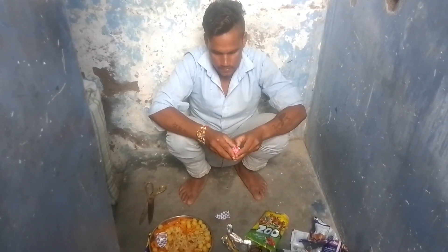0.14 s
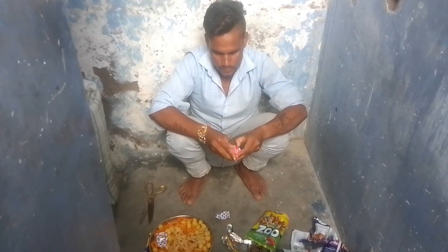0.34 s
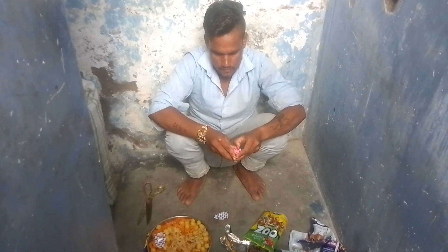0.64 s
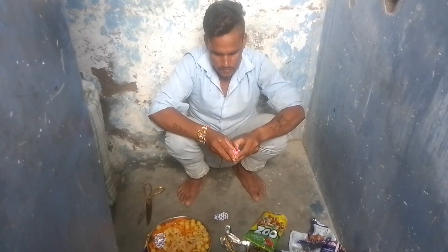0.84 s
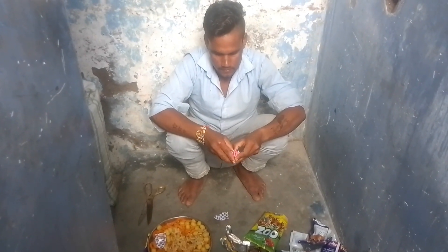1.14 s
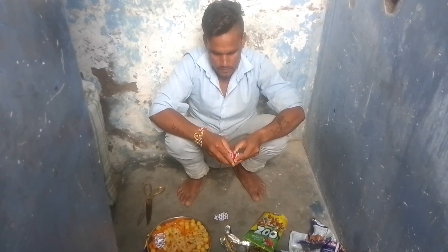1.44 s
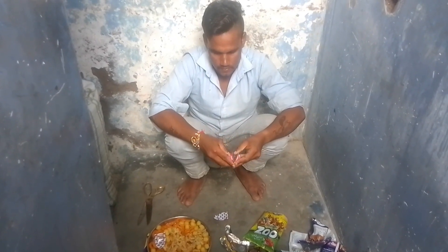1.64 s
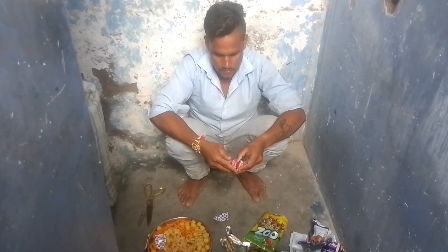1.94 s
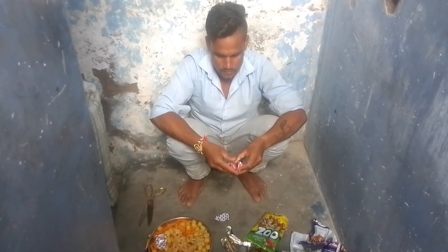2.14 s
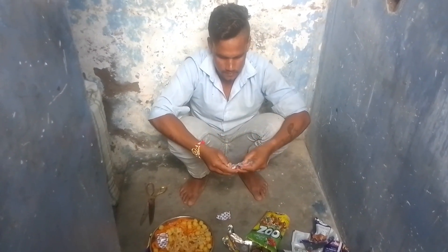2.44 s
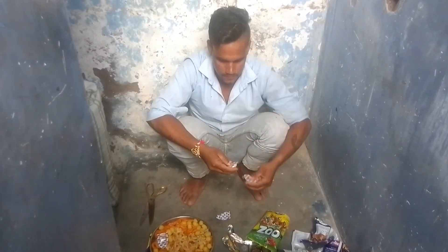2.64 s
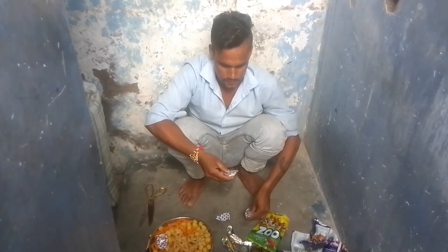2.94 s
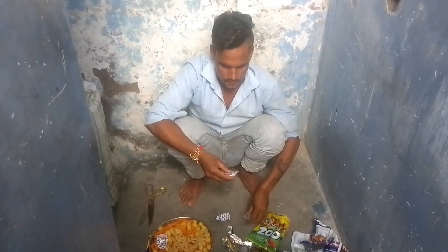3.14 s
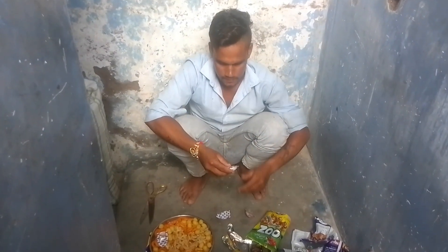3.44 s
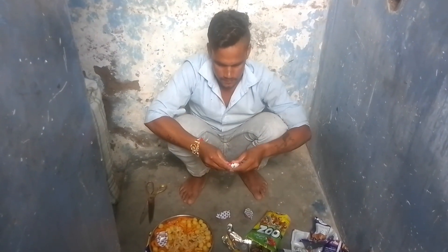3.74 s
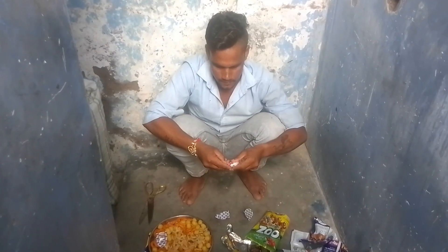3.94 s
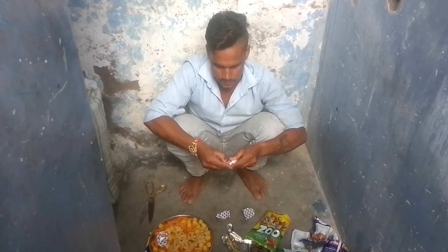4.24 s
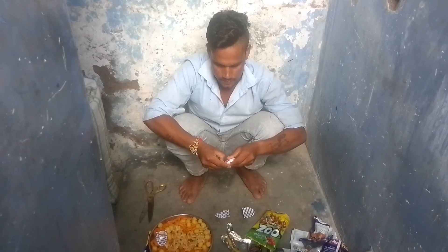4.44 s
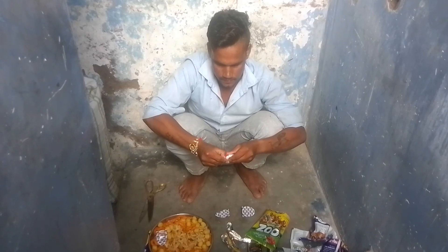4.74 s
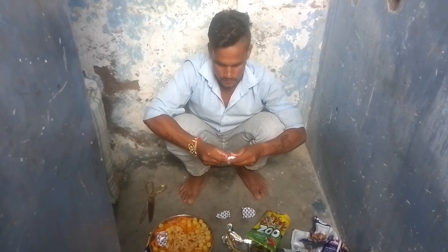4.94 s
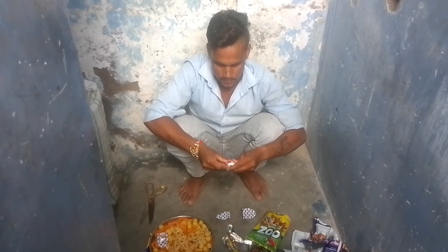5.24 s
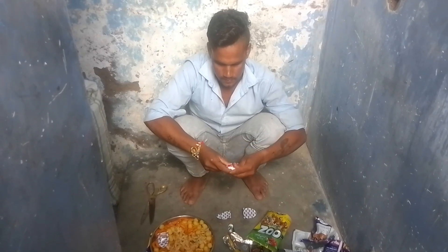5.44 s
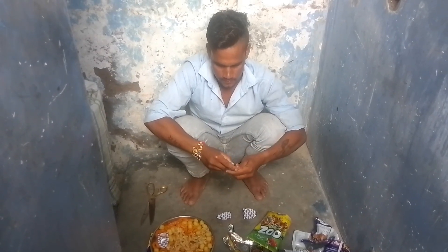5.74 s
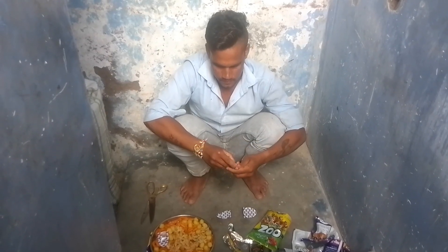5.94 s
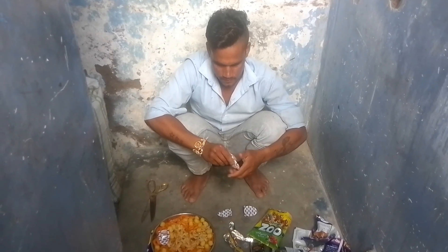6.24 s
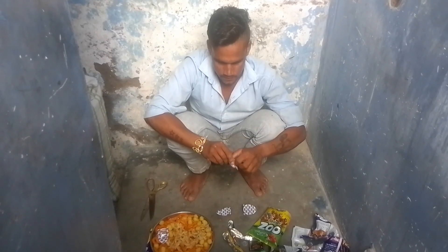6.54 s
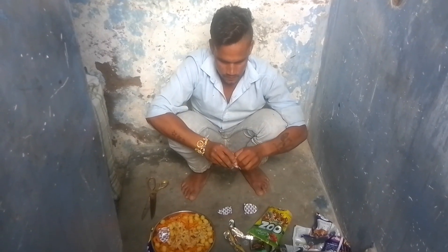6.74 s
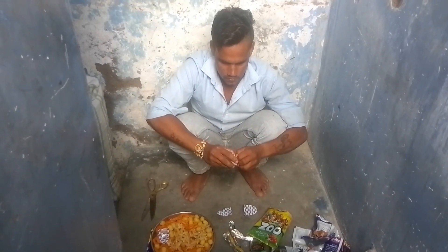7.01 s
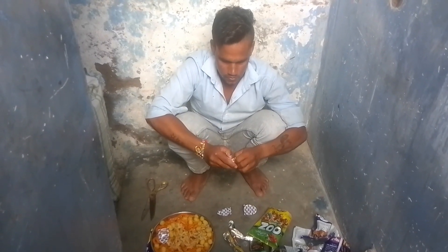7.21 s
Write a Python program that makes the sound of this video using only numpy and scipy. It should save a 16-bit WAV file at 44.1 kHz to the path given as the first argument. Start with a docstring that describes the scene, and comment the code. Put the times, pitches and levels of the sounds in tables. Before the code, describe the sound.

Crisp plastic film snaps, rips briefly and squeaks faintly under fingers over dull air noise, finishing with a crowded sharp crack and a low hollow swell.

```python
"""Hands press, crinkle and tear a small stiff plastic wrapper in a narrow room with bare plastered walls.
Over a steady dull air noise and faint hiss, weak snaps come first, then sharp cracks, tears and a brief hum.
Each crack is a crease buckling, which rings a panel of film; tears are quick runs of tiny fractures.
Between them fingers rub and squeak by stick and slip, and from the middle on a few snaps leave a thin ring.
The loudest snaps crowd together near the end, a low hollow swell follows, and the close walls answer throughout."""
import sys
import numpy as np
from scipy import signal
from scipy.fft import rfft, irfft
from scipy.io import wavfile
from scipy.ndimage import uniform_filter1d, minimum_filter1d

SR = 44100
rng = np.random.default_rng(int(sys.argv[2]) if len(sys.argv) > 2 else 0)


def master_out(mix):
    """Clip the mix to full scale and print it as 16-bit PCM to the path in sys.argv[1]."""
    frames = np.transpose(np.atleast_2d(mix))
    ceiling = np.clip(frames, -1, 1)
    pcm = np.round(ceiling * 32767).astype(np.int16)
    wavfile.write(sys.argv[1], SR, pcm)


N = 325007

# creases that snap, levels relative: (time [s], crack level [dB], ping pitch [Hz], panel pitch [Hz], panel
# level [dB], brightness [dB], length of the tear that follows [s], 0 for none)
CREASES = [(0.2386, -38.5, 5500, 2200, -48, -6, 0.0028), (0.3440, -24.5, 6060, 2040, -39.5, -1, 0.0079),
           (1.0438, -19, 8200, 1830, -31.5, -2, .048), (1.3677, -13, 8500, 1920, -26.5, 1.5, 0.038),
           (1.4333, -8, 9900, 1240, -19.5, -0.5, 0), (1.644, -35, 10000, 1800, -61, -1, 0.0027),
           (1.6655, -17.5, 10200, 1810, -35.5, 7, 0.00099), (1.7923, -21.5, 7200, 2110, -30, 12.5, 0.0008),
           (1.8847, -27.5, 8760, 1690, -46, 14, 0), (1.9775, -26, 9700, 1827, -36.5, 5, 0.015),
           (2.0179, -24, 8940, 1780, -30, -5, 0.0019), (2.2857, -53, 9360, 1730, -58, 0, 0),
           (2.4668, -18, 10550, 2050, -32.5, 5, 0.034), (3.1115, -47, 7530, 2377, -57, -3, 0),
           (3.133, -40, 7100, 2370, -50, -2, 0.064), (3.242, -26.5, 7810, 2100, -39.5, -1.5, 0),
           (3.8456, -33.5, 8374, 1950, -45, 3, 0.00066), (4.7922, -11.5, 7100, 1768, -23, -2.5, 0.033),
           (4.8406, -16.5, 7310, 1890, -21.5, -6.5, 0), (5.1229, -42.5, 7400, 2150, -37.5, -9, 0.0017),
           (5.2026, -50.5, 9640, 2235, -45.5, 3, 0), (5.5401, -30.5, 9300, 2120, -36, 2, 0.0054),
           (5.5573, -29.5, 9110, 1850, -33.5, -2, 0), (5.8664, -53, 9660, 1950, -45.5, 4, 0.00097),
           (5.9358, -53.5, 9150, 2050, -53.5, -6, 0.027), (6.1668, -61, 9430, 1710, -55, -7.5, 0.011),
           (6.314, -40.5, 8600, 2088, -53.5, 4, 0.0027), (6.7134, -46, 9700, 2510, -50.5, -9, 0.0044),
           (6.769, -50, 9350, 1920, -45.5, -5, 0.0068), (6.8429, -36.5, 9200, 1600, -53.5, 0.5, 0),
           (7.051, -29.5, 9865, 1957, -35, 1, 0.0044), (7.0582, -5, 7476, 2060, -16, 7, 0.00075),
           (7.074, -5, 7380, 2020, -16, 6.5, 0), (7.09, -11, 7300, 2130, -18, 5.5, 0.0031),
           (7.2017, -20.5, 8360, 2320, -32, 9, 0.0039), (7.217, -25.5, 8130, 1967, -32.5, -7, 0.00044)]


def snaps(crack_db=-1, body_db=3.5, thud_db=-18, rasp_db=-6.5, edge_db=-16.0, ping_db=-6, bump_db=-15,
          crack_hz=8000, bump_hz=260, rasp_hz=4300, edge_hz=12700):
    """Snap-through buckling: a crease flips in milliseconds of micro-cracks and rings the lower panel beside it."""
    hold_s, fade_s = 0.00052, 0.003  # full power, then the time constant of the amplitude
    panel_octaves, thud_pitch_ratio = .72, .42  # the thud's pitch is relative to the panel
    # a bright snap has more edge, and less rasp and thud: dB per dB of brightness
    edge_slope, rasp_slope, thud_slope = 1.1, 1, 1.4
    # a harder snap spreads wider: dB of rasp and edge per dB of crack above an ordinary snap
    spread_slope, ordinary_snap_db = 0.065, -24.5
    out, t = np.zeros(N), np.arange(SR // 2) / SR
    power = np.exp(-2 * np.maximum(t - hold_s, 0) / fade_s)
    for s, db, ping_hz, panel_hz, panel_db, bright_db, _ in CREASES:
        low_db = (db + panel_db) / 2 + thud_db - thud_slope * bright_db
        wide_db = db + spread_slope * (db - ordinary_snap_db)
        parts = [
            (crack_hz, .7, db + crack_db),
            (ping_hz, .3, db + ping_db),
            (panel_hz, panel_octaves, panel_db + body_db),
            (thud_pitch_ratio * panel_hz, .9, low_db),
            (bump_hz, 1.4, low_db + bump_db),
            (rasp_hz, .65, wide_db + rasp_db - rasp_slope * bright_db),
            (edge_hz, .42, wide_db + edge_db + edge_slope * bright_db)]
        add(out, s, cupped_hands(radiate(power, parts)))
    return out


def tears(fractures_per_s=650, rasp_db=-3.5, edge_db=-11.5, bump_db=-12,
          crack_hz=8000, rasp_hz=3900, edge_hz=12300, thud_hz=800, bump_hz=260):
    """Fracture: some snaps run on as a tear of uneven tiny breaks, too quick to tell apart."""
    delay_s = .008  # from the snap to its tear
    crackle_db, panel_offset_db, thud_offset_db = -9.5, -5, -17  # relative to the snap and its panel
    out, t = np.zeros(N), np.arange(SR // 2) / SR
    for s, snap_db, _, panel_hz, panel_db, _, length in CREASES:
        if length > 0:
            db, thud_db = snap_db + crackle_db, panel_db + thud_offset_db
            parts = [
                (crack_hz, .75, db),
                (rasp_hz, 1.1, db + rasp_db),
                (edge_hz, .4, db + edge_db),
                (panel_hz, .8, panel_db + panel_offset_db),
                (thud_hz, 1.1, thud_db),
                (bump_hz, 1.4, thud_db + bump_db)]
            fractures = slips(t, fractures_per_s, spread_db=4.5, fade_s=0.00036) * (t < length)
            add(out, s + delay_s, radiate(fractures, parts))
    return out


def fingers():
    """Dry friction: fingers rub and brush the film, and the panel slides back under them after every snap."""
    # rubs, levels relative: (start [s], length [s], pitch [Hz], width [octaves], level [dB])
    rubs = [(1.18, 0.13, 2053, .35, -55.5), (1.795, 0.02, 2100, 0.28, -36.5), (2.121, 0.2, 1580, 0.5, -60),
            (2.625, .035, 1940, 0.24, -41), (2.68, 0.24, 1970, 0.6, -64), (3.14, .045, 3374, .14, -52),
            (3.191, 0.089, 1255, 0.6, -56.5), (3.25, 0.045, 1834, 0.12, -47.5),
            (3.848, 0.046, 2550, 0.29, -54), (5.137, 0.077, 2020, .45, -52),
            (5.882, 0.12, 1944, 0.38, -50.5), (6.169, .21, 2020, 2.1, -71.5),
            (6.672, 0.23, 2100, 0.64, -53.5), (6.743, 0.029, 2280, 0.56, -40),
            (7.215, .012, 970, .34, -39.5), (7.258, 0.16, 2100, .8, -56)]
    # light brushes of dry skin, levels relative: (start [s], length [s], level [dB])
    light_touches = [(0.828, 0.038, -65.5), (2.80, 0.17, -67), (3.548, 0.33, -70), (7.28, 0.079, -58)]
    brush_hz, brush_octaves = 7400, 1.4
    # settling: pitch and level are relative to the panel; the limit holds however hard the snap
    settle_s, settle_pitch_ratio, settle_octaves = .03, 1.1, .55
    settle_db, settle_limit_db = -8.5, -39
    brushes = [(s, length, brush_hz, brush_octaves, db) for s, length, db in light_touches]
    settling = [(s, settle_s, settle_pitch_ratio * panel_hz, settle_octaves,
                 min(panel_db + settle_db, settle_limit_db))
                for s, _, _, panel_hz, panel_db, _, _ in CREASES]
    return strokes(rubs + brushes + settling, slips_per_s=610)


def squeaks(octaves=.035, typical_s=.11, purity=.4):
    """Stick-slip oscillation: taut film sings in one narrow band, which is purer the longer the squeak lasts."""
    # squeaks of the stretched film, levels relative: (start [s], length [s], pitch [Hz], level [dB])
    taut_film = [(0.239, 0.0093, 1035, -52), (0.347, 0.0067, 1080, -48), (.346, 0.022, 2125, -52),
                 (1.795, .01, 2450, -39), (1.152, 0.19, 10440, -64), (1.19, .11, 7880, -58.5),
                 (2.30, .05, 10950, -63), (2.352, .085, 10950, -49.5), (2.37, 0.11, 12000, -57.5),
                 (5.119, 0.0062, 7180, -41), (6.313, .006, 5920, -45), (6.315, 0.0078, 8830, -47.5),
                 (6.833, 0.093, 9300, -56.5)]
    narrow = [(s, length, hz, octaves * (typical_s / length) ** purity, db)
              for s, length, hz, db in taut_film]
    return strokes(narrow, slips_per_s=3000)


def rings(hz=2859, octaves=0.038, t60_s=.65):
    """Free decay of a lightly damped resonance: a thin tone starts with the snap and dies slowly."""
    # snaps after which the film rings on, levels relative: (time [s], level [dB])
    ringing_snaps = [(3.846, -59), (5.125, -52), (5.541, -50.5)]
    out, t = np.zeros(N), np.arange(SR * 3 // 4) / SR
    power = from_db(-60 * t / t60_s) ** 2
    for s, db in ringing_snaps:
        add(out, s, radiate(power, [(hz, octaves, db)]))
    return out


def hum(hz=430.8, octaves=0.47):
    """Resonance under rough excitation: a faint hum swells and fades on one low pitch."""
    # swells of the hum, levels relative: (start [s], length [s], level [dB])
    hum_swells = [(1.097, 0.31, -65), (1.93, 0.3, -69), (2.45, 0.5, -69.5)]
    return strokes([(s, length, hz, octaves, db) for s, length, db in hum_swells], slips_per_s=1300)


def hollow():
    """Superposed low resonances: dense irregular pulses make a hollow sound that swells and fades."""
    # hollow swells, levels relative: (start [s], length [s], pitch [Hz], width [octaves], level [dB])
    hollow_swells = [(7.305, 0.055, 383, 0.14, -37.5), (7.32, 0.085, 180, 0.31, -43.5),
                     (7.32, 0.094, 543, 0.26, -46)]
    return strokes(hollow_swells, slips_per_s=3000)


def strokes(table, slips_per_s):
    """Stick and slip: small releases feed one resonance under a stroke that swells and fades."""
    out, t = np.zeros(N), np.arange(SR * 3 // 4) / SR
    for s, length, hz, octaves, db in table:
        pressure = np.sin(np.pi * np.minimum(t / length, 1))
        add(out, s, radiate(pressure * slips(t, slips_per_s), [(hz, octaves, db)]))
    return out


def slips(t, per_s, spread_db=3, fade_s=0.0014):
    """Random point process: power of tiny releases of uneven size, scaled to mean 1 and briefly stored."""
    happens = rng.random(len(t)) < per_s / SR
    power = happens * from_db(spread_db * rng.standard_normal(len(t))) ** 2
    return after_lag(power / (np.mean(power) + 1e-20), fade_s)


def radiate(power, parts):
    """Forced resonance: micro-cracks drive bands (Hz, octaves, dB); moving hands vary the fine echo pattern."""
    out = 0
    for hz, octaves, level_db in parts:
        arriving = room(power, hz)
        ring = band(np.sqrt(arriving) * rng.standard_normal(len(power)), hz, octaves)
        out = out + from_db(level_db) * np.sqrt(np.mean(arriving)) * rms_one(ring)
    return out


def cupped_hands(x, gain=0.27, longest_s=.003, count=3):
    """Comb filtering: very short echoes off palms, knees and floor tint each sound differently."""
    out = x.copy()
    for lag in (rng.uniform(.1, 1, count) * longest_s * SR).astype(int) + 1:
        out[lag:] += gain * x[:-lag]
    return out / np.sqrt(1 + count * gain ** 2)


def room(power, hz, diffuse_db=0.0, gather_s=0.0045, direct_db=-2, scatter_s=0.0015):
    """Reverberation: power in one band arrives scattered by hands, knees and floor, as echoes, then as a tail."""
    # decay time of the room: (frequency [Hz], time to fall by 60 dB [s])
    decay_times = [(200, 0.57), (800, 0.53), (2000, 0.41), (5500, 0.26), (9000, 0.3), (15000, 0.18)]
    # echoes from the near walls, relative to the scattered sound: (delay [s], level [dB])
    wall_echoes = [(0.014, -8.5), (0.0179, -9), (.033, -13)]
    energy_decay_s = at_hz(decay_times, hz) / np.log(10 ** 6)
    tail = after_lag(after_lag(power, gather_s), energy_decay_s)
    first = after_lag(power, scatter_s)
    arriving = from_db(direct_db) ** 2 * first + from_db(diffuse_db) ** 2 * tail
    for delay, db in wall_echoes:
        lag = int(delay * SR)
        arriving[lag:] += from_db(db) ** 2 * first[:-lag]
    return arriving


def standing_waves(x, ring_db=-8.0, t60=0.3, start_s=0.0057):
    """Room modes: sound trapped between the walls rings at the same dense set of pitches every time."""
    t = np.arange(SR // 2) / SR
    ringing = rng.standard_normal(len(t)) * from_db(-60 * t / t60) * (1 - np.exp(-t / start_s))
    ringing = ringing / np.sqrt(np.sum(ringing ** 2))
    return x + from_db(ring_db) * signal.fftconvolve(x, ringing)[:N]


def room_colour(x):
    """Interference: the close walls reinforce some low pitches and cancel others."""
    # broad peaks and dips of the narrow room: (frequency [Hz], width [octaves], nominal gain [dB])
    peaks_and_dips = [(503, 0.32, 6), (665, 0.71, -7), (883, 0.75, 3.5), (1220, 0.18, 3)]
    for hz, octaves, db in peaks_and_dips:
        x = x + (from_db(db) - 1) * band(x, hz, octaves, order=1)
    return x


def background():
    """Stationary filtered noise: dull air noise, a faint treble hiss and a few narrow resonances."""
    # shape of the air noise: (frequency [Hz], relative level per Hz [dB])
    air_spectrum = [(15, -15), (25, 0.5), (55, -9.5), (83, -23.5), (115, -9), (150, -10), (400, -3),
                    (600, -9.5), (900, -10.5), (1400, -13.5), (2000, -15.5), (2900, -17), (3600, -25.5),
                    (5000, -45.5)]
    # shape of the hiss: (frequency [Hz], relative level per Hz [dB])
    hiss_spectrum = [(2500, -21.5), (3800, -4), (7000, -5), (8500, -1), (9700, 2.5), (11000, -7.5),
                     (15500, -12)]
    # resonances that colour the background: (frequency [Hz], width [octaves], level [dB])
    resonances = [(51, 0.13, -83), (184.9, 0.07, -76.5), (403.2, 0.064, -75), (809, 0.026, -76),
                  (9600, .1, -78.5)]
    air = from_db(-65) * steady_noise(air_spectrum)
    hiss = from_db(-71.5) * steady_noise(hiss_spectrum)
    drones = sum(from_db(db) * rms_one(band(rng.standard_normal(N), hz, octaves))
                 for hz, octaves, db in resonances)
    return air + hiss + drones


def steady_noise(spectrum):
    """Spectral shaping: Gaussian noise with the given spectrum, rms 1."""
    hz = np.maximum(np.arange(N // 2 + 1) * SR / N, 1)
    white = rfft(rng.standard_normal(N))
    return rms_one(irfft(white * from_db(at_hz(spectrum, hz)), N))


def after_lag(power, lag):
    """Exponential relaxation: energy is stored and leaks away with time constant lag in seconds."""
    keep = np.exp(-1 / (lag * SR))
    return signal.lfilter([1 - keep], [1, -keep], power + 1e-18)


def band(x, hz, octaves, order=2):
    """Resonance as a causal band-pass around hz."""
    half = 2 ** (octaves / 2)
    edges = [hz / half, min(hz * half, .47 * SR)]
    return signal.sosfilt(signal.butter(order, edges, "band", fs=SR, output="sos"), x)


def from_db(db):
    """Level law: decibels to amplitude gain."""
    return 10 ** (np.asarray(db) / 20)


def rms_one(x):
    """Normalisation of power: scale to unit rms."""
    return x / np.sqrt(np.mean(x ** 2) + 1e-20)


def at_hz(points, hz):
    """Linear interpolation of a table on a log-frequency axis."""
    table = np.array(points)
    return np.interp(np.log(hz), np.log(table[:, 0]), table[:, 1])


def add(out, s, sound):
    """Superposition: mix a sound in at time s."""
    at = round(s * SR)
    out[at:at + len(sound)] += sound[:N - at]


def limiter(x, ceiling_db=-3, size=89):
    """Gain reduction: the level dips smoothly for a few milliseconds around each peak above the ceiling."""
    gain = np.minimum(1, from_db(ceiling_db) / (np.abs(x) + 1e-9))
    return x * uniform_filter1d(minimum_filter1d(gain, size), size)


def scene():
    """Superposition: the wrapper and hum in the coloured room, with the hollow swell and background."""
    snapping = from_db(-2.5) * snaps() + from_db(-4.5) * tears()
    rubbing = from_db(-3.0) * fingers() + from_db(-1) * squeaks() + from_db(-3) * rings()
    in_room = room_colour(standing_waves(snapping + rubbing + from_db(-3.0) * hum()))
    return (in_room + from_db(-3) * hollow() + background())[None]


def record(dry):
    """Limiting and low-pass filtering: the loudest peaks are held down and the treble is cut steeply."""
    cutoff_hz = 15600
    low_pass = signal.ellip(10, .3, 80, cutoff_hz, fs=SR, output="sos")
    return signal.sosfilt(low_pass, limiter(dry))


dry = scene()
out = record(dry)
master_out(out)
```